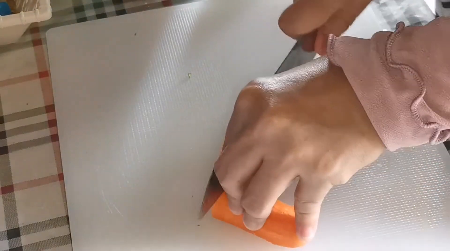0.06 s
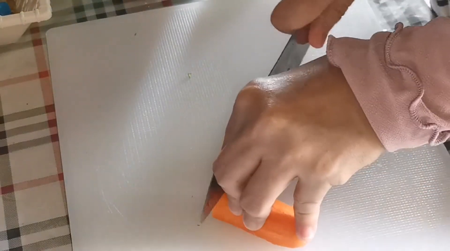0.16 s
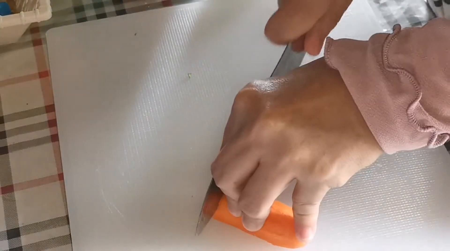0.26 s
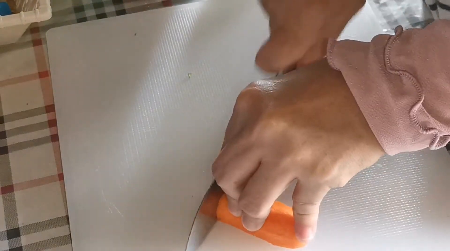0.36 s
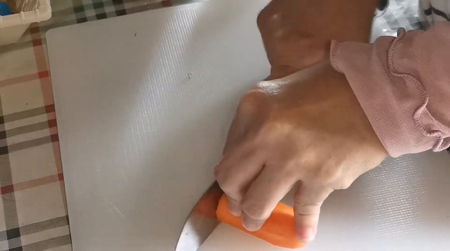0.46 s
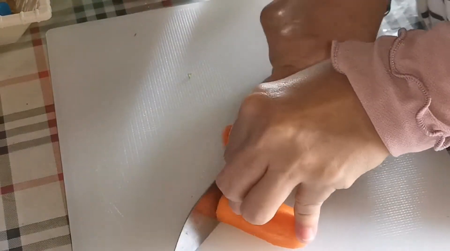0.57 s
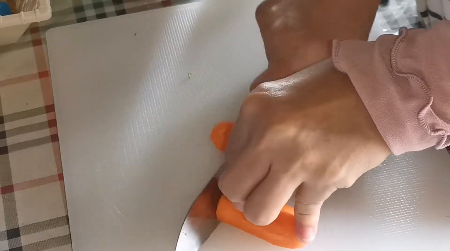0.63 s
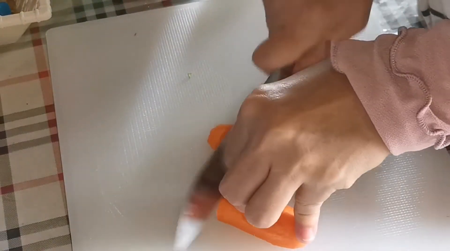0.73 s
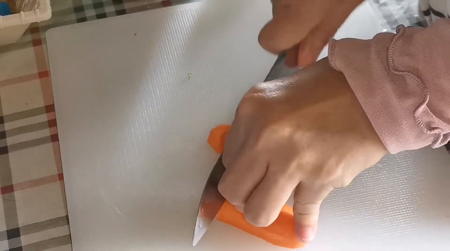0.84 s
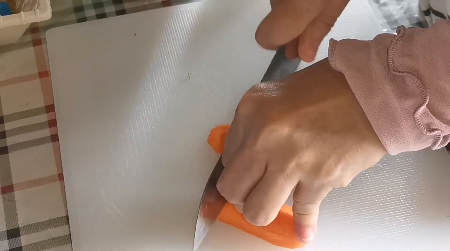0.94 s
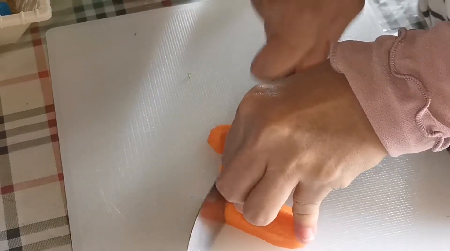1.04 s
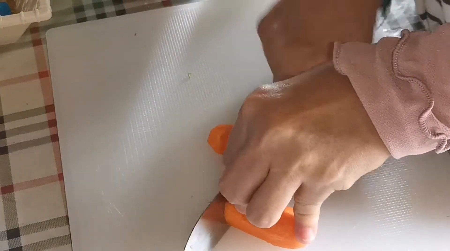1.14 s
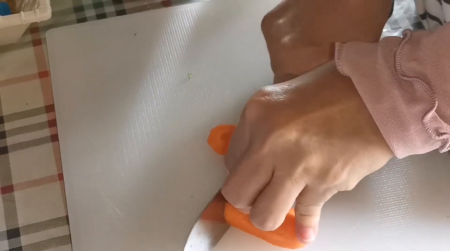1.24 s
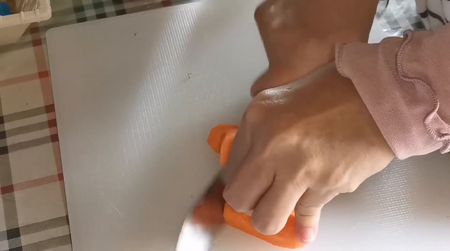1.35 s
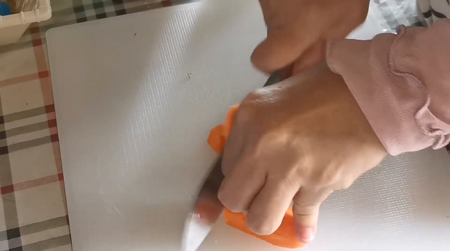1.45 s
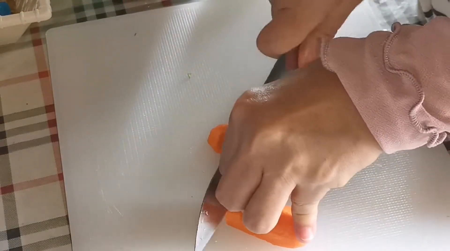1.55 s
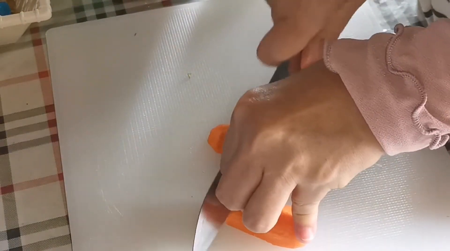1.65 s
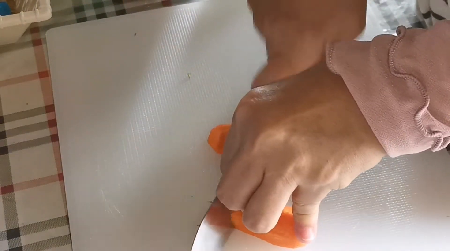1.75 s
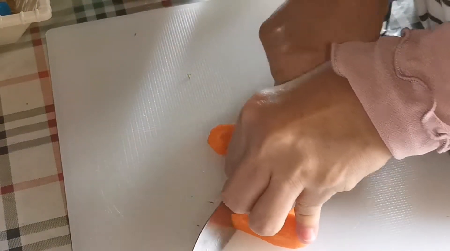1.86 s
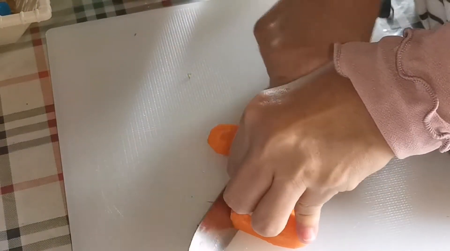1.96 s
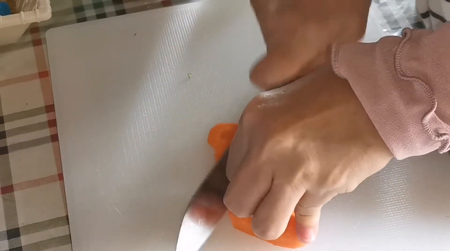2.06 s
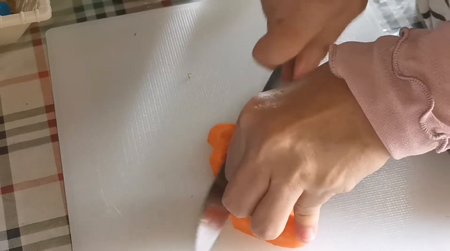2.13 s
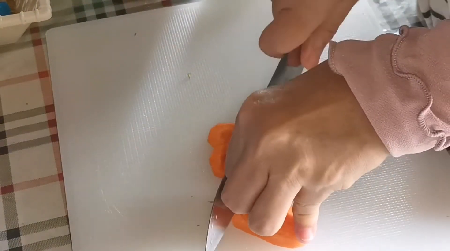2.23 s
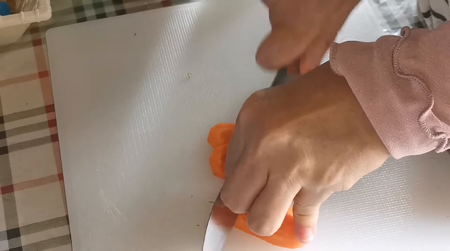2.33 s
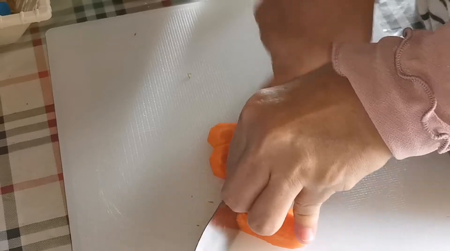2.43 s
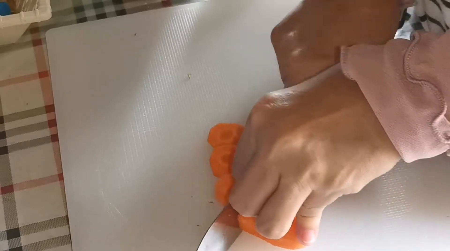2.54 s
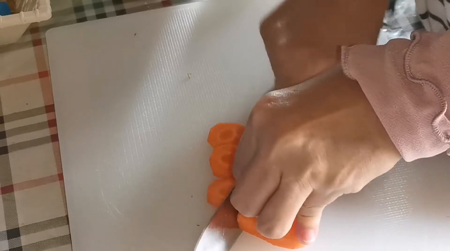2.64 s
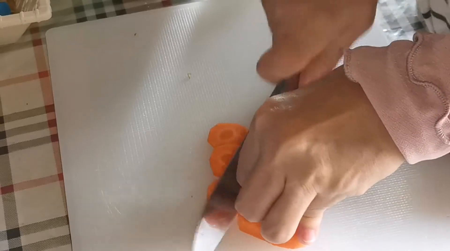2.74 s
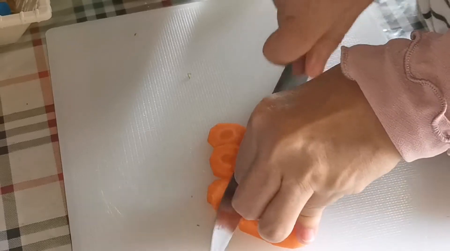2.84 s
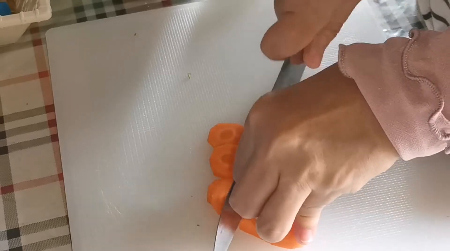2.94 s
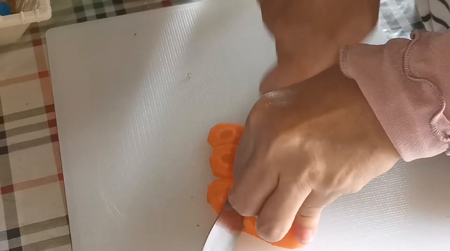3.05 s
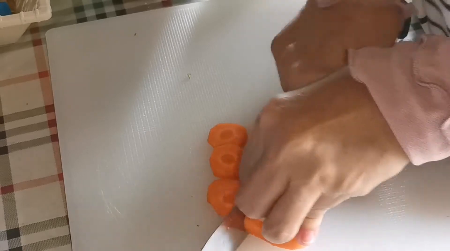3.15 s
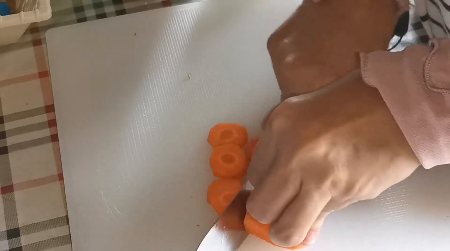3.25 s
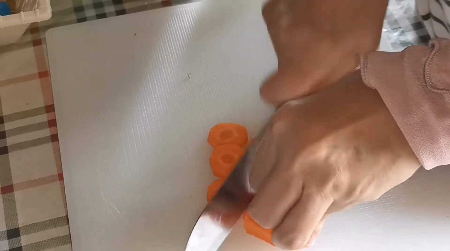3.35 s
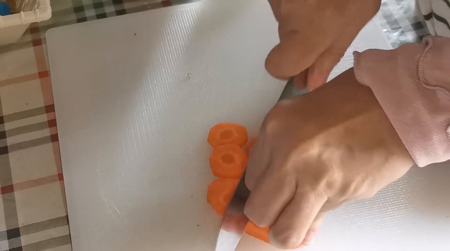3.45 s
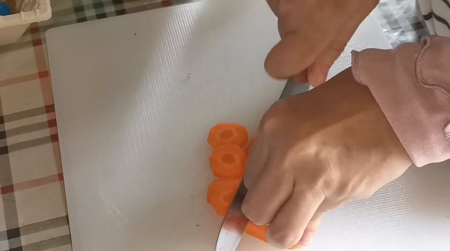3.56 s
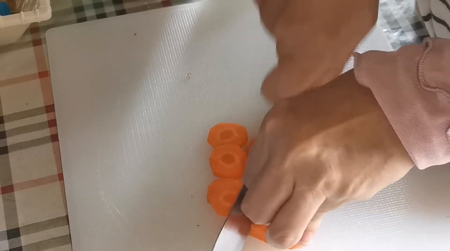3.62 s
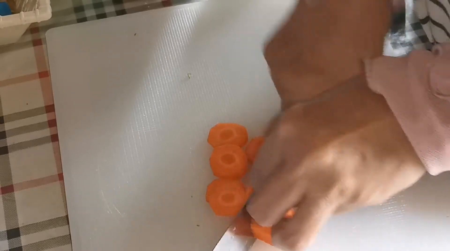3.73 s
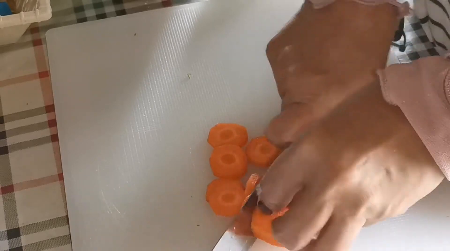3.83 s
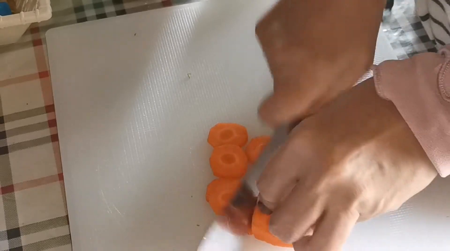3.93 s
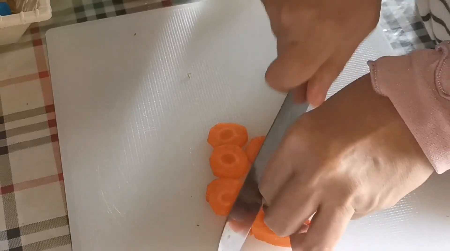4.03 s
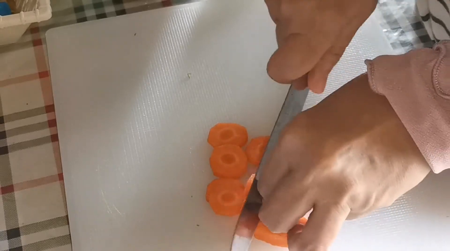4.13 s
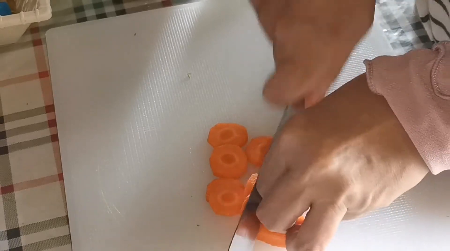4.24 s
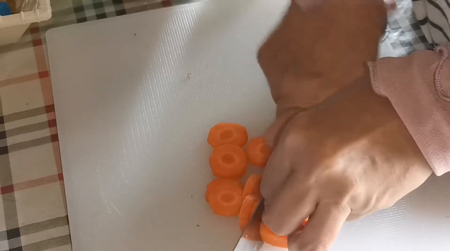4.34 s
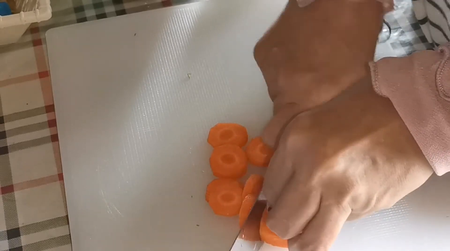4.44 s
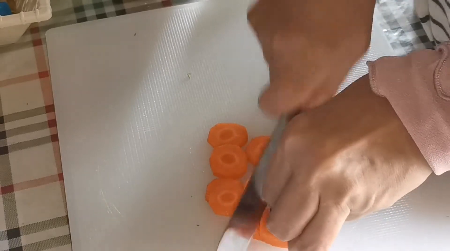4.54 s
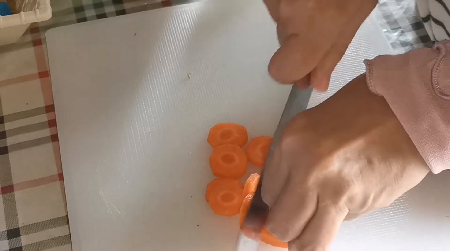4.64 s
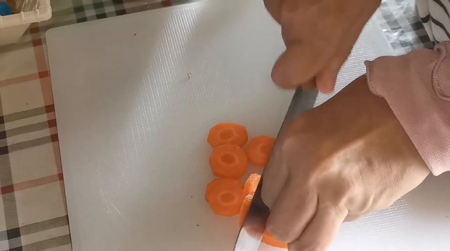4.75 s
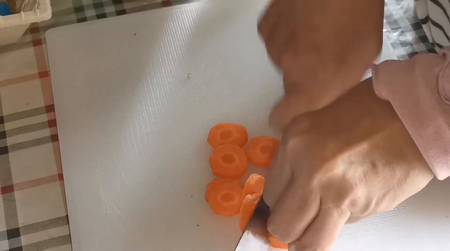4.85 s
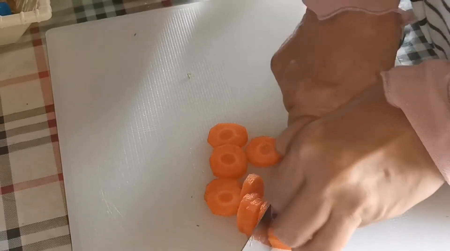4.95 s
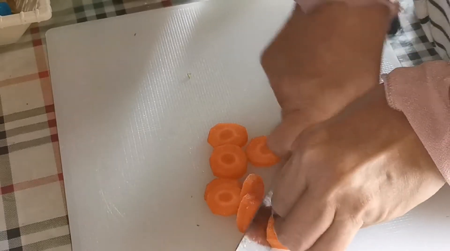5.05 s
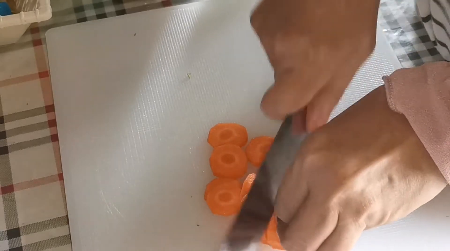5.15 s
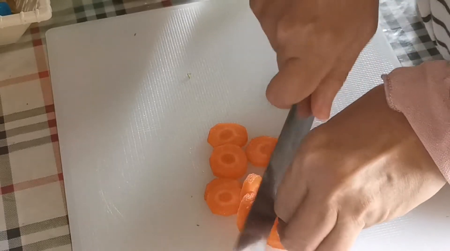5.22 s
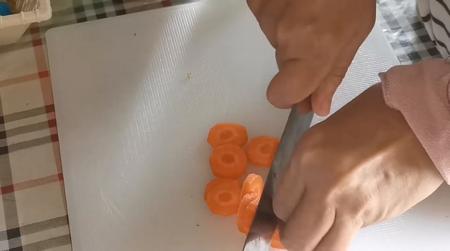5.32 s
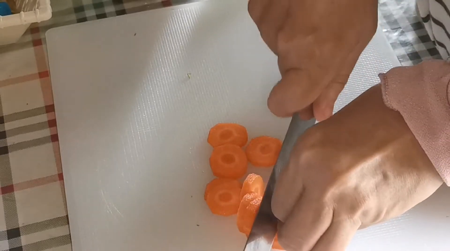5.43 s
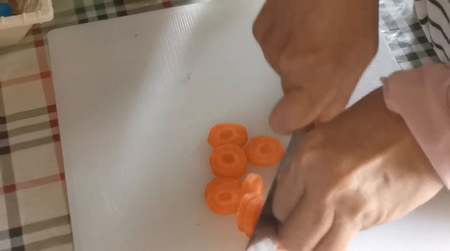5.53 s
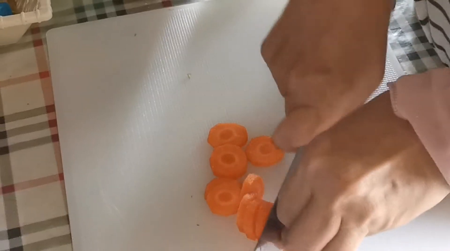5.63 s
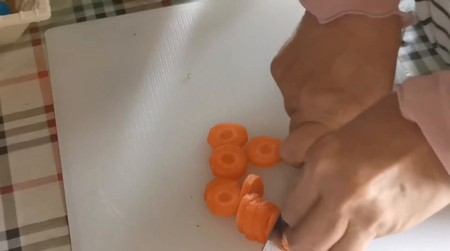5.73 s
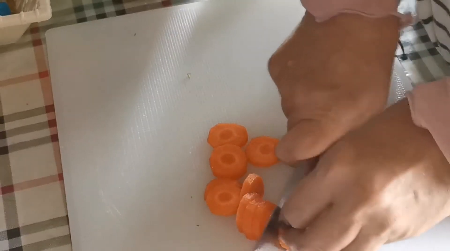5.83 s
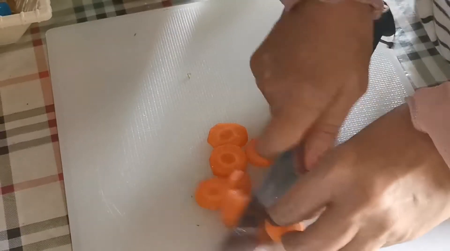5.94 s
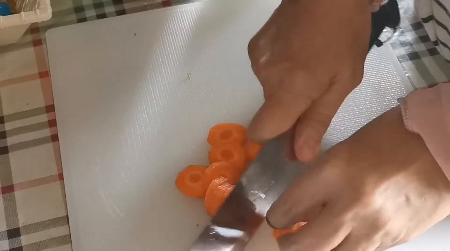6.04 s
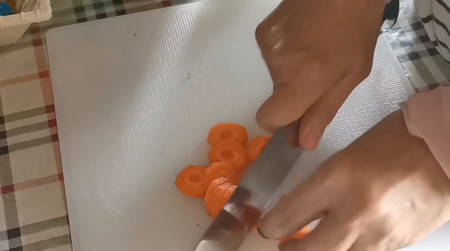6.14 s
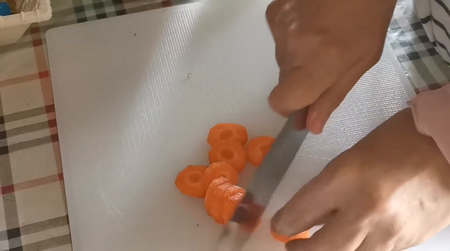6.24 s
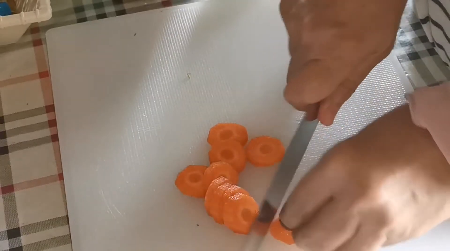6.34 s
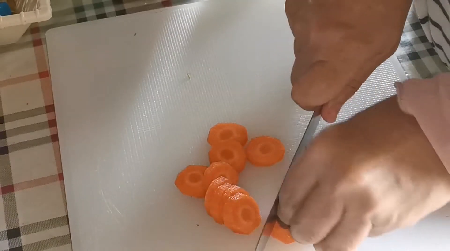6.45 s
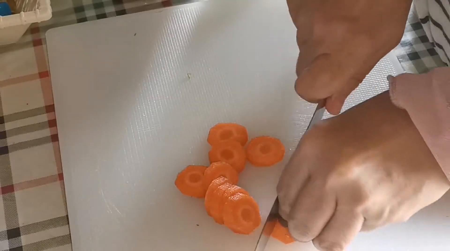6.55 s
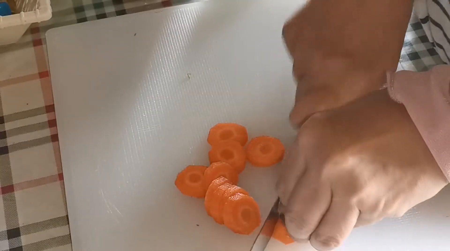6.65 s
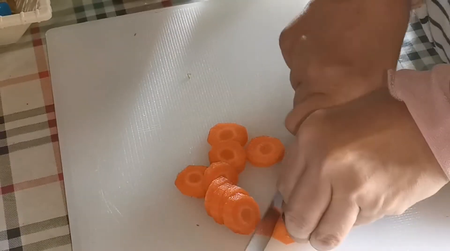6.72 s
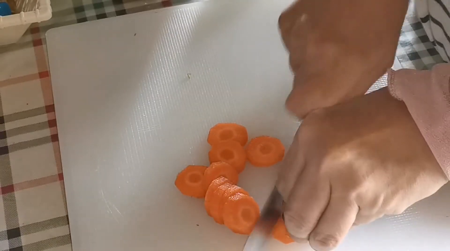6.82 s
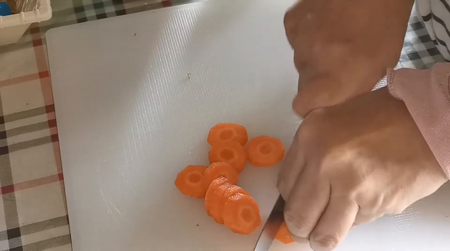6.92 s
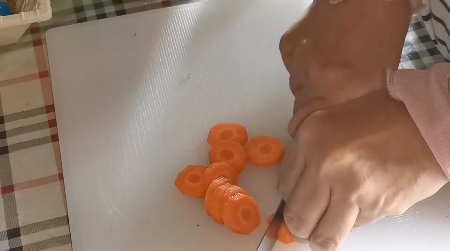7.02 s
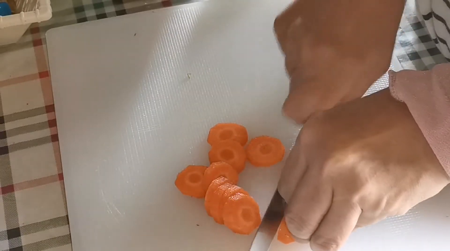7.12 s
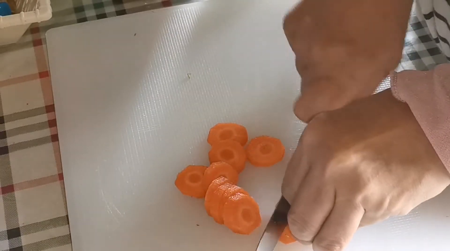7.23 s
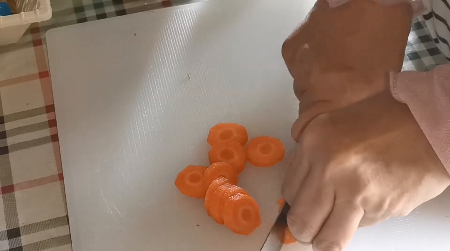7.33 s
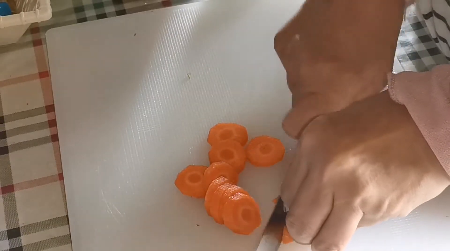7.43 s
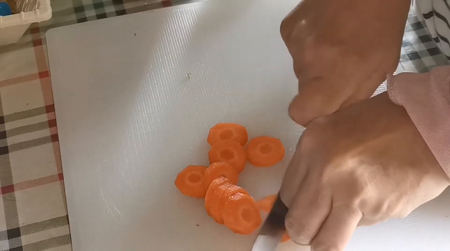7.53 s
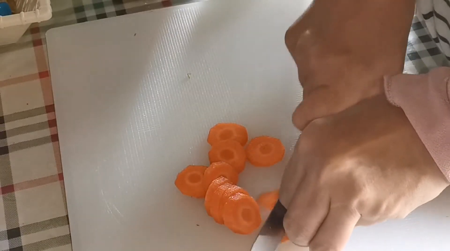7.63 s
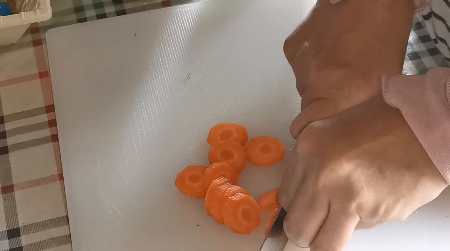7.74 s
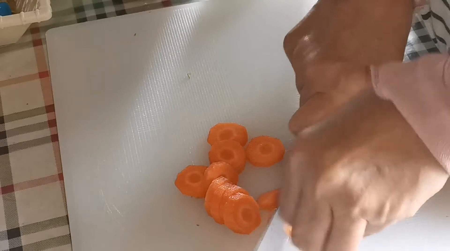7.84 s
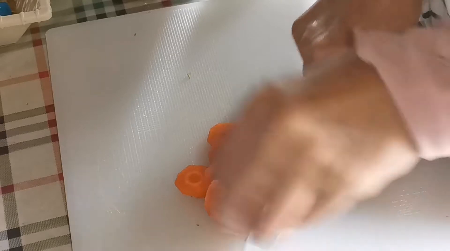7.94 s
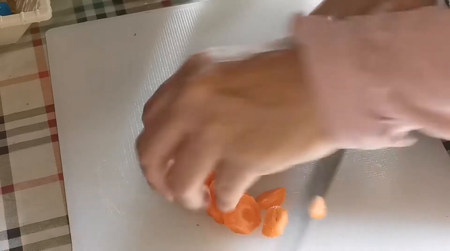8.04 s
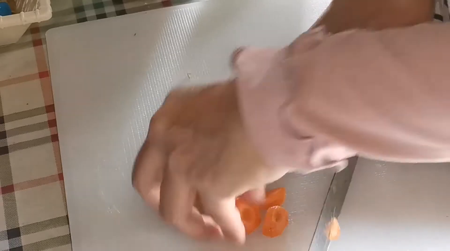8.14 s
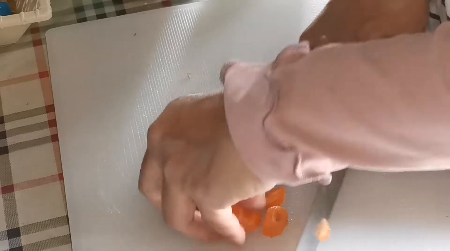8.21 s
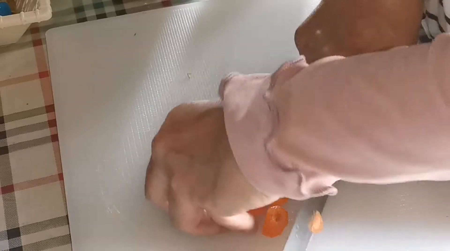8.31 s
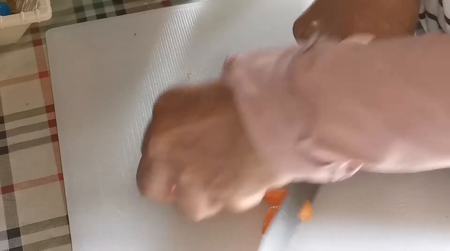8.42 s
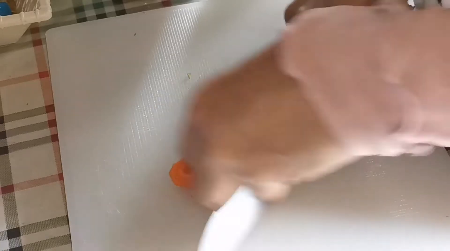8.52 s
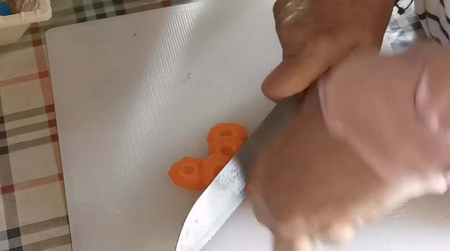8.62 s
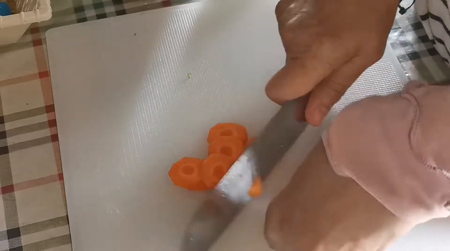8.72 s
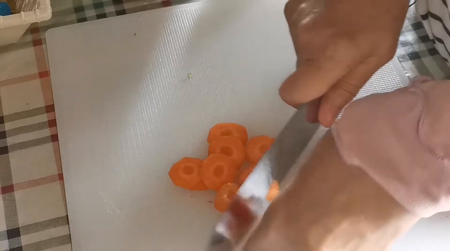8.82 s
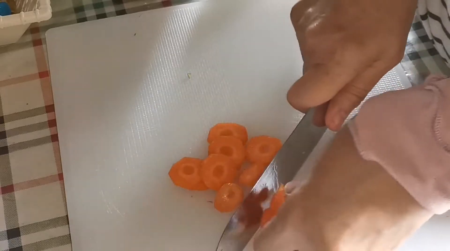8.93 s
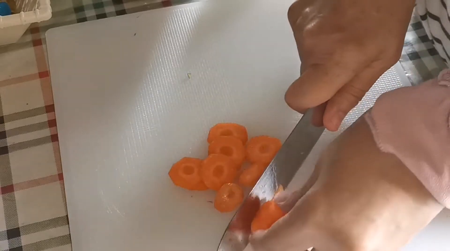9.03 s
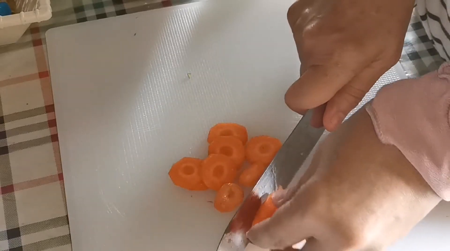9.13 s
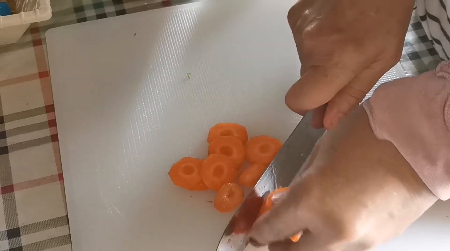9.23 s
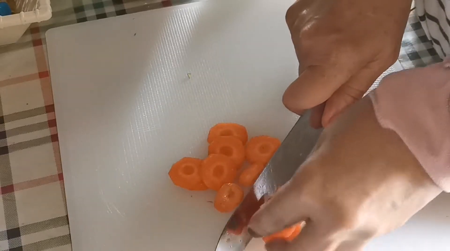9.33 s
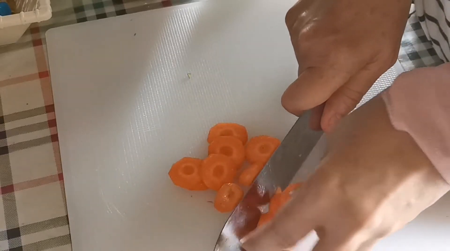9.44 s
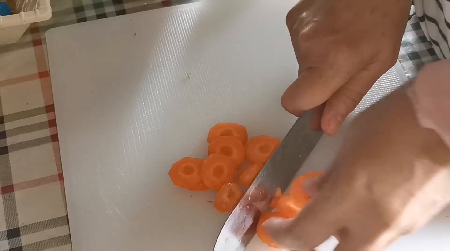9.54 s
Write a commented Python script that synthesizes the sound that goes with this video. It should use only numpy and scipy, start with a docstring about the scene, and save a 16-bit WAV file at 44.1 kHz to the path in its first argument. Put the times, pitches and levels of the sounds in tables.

```python
"""Slicing a carrot

A knife cuts a carrot on a plastic board in a small kitchen. Fibres tear with a hiss, crackle and snap;
the edge knocks on the board, which rocks and thumps on the table, and the room answers briefly.
Late on, a hand drags slices across the board with a scraping swish. Behind: a few distant bird chirps,
a low rumble, a band of hiss near 8 kHz and a fading hum."""
import sys
import numpy as np
from scipy import signal
from scipy.fft import rfft, irfft, next_fast_len
from scipy.io import wavfile

SR = 44100
rng = np.random.default_rng(int(sys.argv[2]) if len(sys.argv) > 2 else 0)


def unload_wav(signal):
    """Save mono or channel-first audio to the path in sys.argv[1] as 16-bit WAV at rate SR, clipped to [-1, 1]."""
    wavfile.write(
        sys.argv[1],
        SR,
        np.round(np.clip(np.atleast_2d(signal).T, -1, 1) * 32767).astype(np.int16),
    )


N = 422301

# board rocking: f/Hz, level/dB, t60/s
ROCKING_MODES = [(158.6, -3, 0.13), (206.4, 8.5, 0.022), (319, 6, 0.047), (436, 5.5, 0.012)]


def amp(db):
    """dB to gain."""
    return 10 ** (np.asarray(db) / 20)


def rms_one(x):
    """Scale to rms 1."""
    return x / np.sqrt(np.mean(x ** 2) + 1e-20)


def in_time(curve):
    """(t/s, value) rows to one value per sample."""
    return np.interp(np.arange(N) / SR, *np.transpose(curve))


def at_hz(curve, hz):
    """Read (f/Hz, value) rows on a log-frequency axis."""
    knots_hz, values = np.transpose(curve)
    return np.interp(np.log(hz), np.log(knots_hz), values)


def band(x, low_hz, high_hz):
    """Band-pass."""
    return signal.sosfilt(signal.butter(2, [low_hz, high_hz], "band", fs=SR, output="sos"), x)


def drift(rate_hz):
    """Slow random wander, rms 1."""
    hop = 40
    r = np.exp(-2 * np.pi * rate_hz * hop / SR)
    slow = signal.lfilter([1], [1, -2 * r, r * r], rng.standard_normal(N // hop + 2002))[2000:]
    return np.interp(np.arange(N) / hop, np.arange(len(slow)), rms_one(slow))


def colour(x, spectrum):
    """Filter by (f/Hz, level/dB) rows; rms 1."""
    size = next_fast_len(N)
    hz = np.maximum(np.fft.rfftfreq(size, 1 / SR), 1)
    return rms_one(irfft(rfft(x, size) * amp(at_hz(spectrum, hz)), size)[:N])


def ring(clicks, hz, t60_s):
    """One mode: each click starts a decaying sine."""
    r, w = amp(-60 / (t60_s * SR)), 2 * np.pi * hz / SR
    return signal.lfilter([0, np.sin(w)], [1, -2 * r * np.cos(w), r * r], clicks + 1e-18)


def grains(per_s, spread_db):
    """Random clicks of uneven size and sign."""
    sizes = amp(spread_db * np.minimum(rng.exponential(1, N), 5)) * rng.choice([-1, 1], N)
    return sizes * (rng.random(N) < per_s / SR)


def cutting():
    """Fibres burst into hiss; clumps of coarser breaks creak in the board; the blade rubs wet flesh."""
    # spectra: f/Hz, level/dB
    tearing_spectrum = [(2940, -1.5), (5000, -1.5), (5880, -8), (6880, -0.5), (8100, -11.5), (9170, -1.5),
                        (11700, -6), (15600, -18)]
    rubbing_spectrum = [(900, -29), (1500, 4), (2300, 7), (3200, -1.5), (4750, 1.5), (6500, -10.5),
                        (9000, -19), (14000, -47)]
    # board under the pressed carrot: f/Hz, level/dB, t60/s
    creak_modes = [(305, -9, 0.04), (631, -5.5, 0.061), (799.5, 4, 0.02), (938, -2.5, 0.033),
                   (1117, -7, 0.015), (1314, -8.5, 0.0074), (1680, -16, 0.0072)]
    # hiss above 12 kHz, weaker at the carrot's thin end: t/s, level/dB
    top_curve = [(0, 0), (5.9, 0), (6.02, -13), (9.58, -13)]
    hiss_gain, creak_gain, rub_gain = stroke_gains()
    tearing = colour(grains(15000, 2.5) * amp(1.5 * drift(40)), tearing_spectrum)
    top = signal.sosfilt(signal.butter(4, 12000, "high", fs=SR, output="sos"), tearing)
    low = signal.sosfilt(signal.butter(4, 12000, fs=SR, output="sos"), tearing)
    hiss = low + amp(in_time(top_curve)) * top
    rub = colour(grains(9000, 0.71) * amp(2.5 * drift(26)), rubbing_spectrum)
    breaks = grains(2500, 1.8) * amp(2.8 * drift(30))
    creak = sum(amp(db) * ring(breaks, hz, t60_s) for hz, db, t60_s in creak_modes)
    return hiss_gain * hiss + creak_gain * rms_one(creak) + rub_gain * rub


def stroke_gains():
    """Hiss, creak and rub gains: each stroke bites, swells as the blade sinks, dies once through."""
    # blade through carrot or along board: start/s, end/s, hiss/dB, creak/dB, rub/dB
    strokes = [(-.1, 0.05, -68.5, -74, -71), (0.382, 0.568, -59, -49.5, -60),
               (1.02, 1.257, -59.5, -48.5, -59), (1.54, 1.588, -73, -63, -67),
               (1.72, 1.954, -59, -46, -59.5), (2.38, 2.611, -58.5, -45.5, -60),
               (2.81, 2.83, -77, -73, -90), (3.062, 3.253, -58, -46, -64), (3.468, 3.487, -72, -75, -78),
               (3.67, 3.849, -58.5, -45.5, -64), (4.32, 4.45, -58.5, -49.5, -61),
               (4.663, 4.68, -82, -79, -86), (4.845, 5.046, -57, -52, -63.5),
               (5.54, 5.815, -64, -48.5, -66), (6.038, 6.09, -67, -49, -57.5),
               (6.682, 6.759, -65, -49.5, -55), (6.942, 6.945, -67, -86, -76),
               (7.027, 7.086, -62.5, -52.5, -51.5), (7.312, 7.346, -63.5, -39, -52),
               (7.364, 7.43, -59.5, -46, -51.5), (7.597, 7.622, -75, -66, -66),
               (7.769, 7.803, -62, -49, -53.5), (8.317, 8.449, -89, -60, -80),
               (8.48, 8.596, -95, -56, -68.5), (8.677, 8.71, -84, -63, -75),
               (8.91, 8.927, -79, -59.5, -76.5), (8.976, 8.985, -86, -49, -86)]
    # fingers and blade shifting between strokes: t/s, level/dB
    handling = [(0, -83), (.35, -73.5), (.7, -80), (1.6, -95), (2.3, -82.5), (3.0, -83), (4.0, -82.5),
                (4.85, -84.5), (5.2, -88), (5.5, -74), (5.95, -85), (6.6, -83), (7.3, -77.5), (7.75, -88),
                (8.2, -86), (9.0, -88), (9.58, -85.5)]
    # rows: hiss, creak, rub
    swell_db_per_s, release_db_per_s = np.vstack([41, 41.5, 24.5]), np.vstack([262, 196, 251.5])
    peak_lead_s, handling_share_db = np.vstack([0.0011, 0.0083, 0.001]), np.vstack([0, 14.5, 4])
    t = np.arange(N) / SR
    rustle_db = in_time(handling) + 2 * drift(5.6)
    power = amp(rustle_db + handling_share_db) ** 2
    for start_s, end_s, *levels_db in strokes:
        span = slice(max(int(start_s * SR), 0), int((end_s + 0.4) * SR))
        to_peak_s = end_s - peak_lead_s - t[span]
        loss_db = np.where(to_peak_s > 0, swell_db_per_s, release_db_per_s) * np.abs(to_peak_s)
        bite_s = max(0.46 * (end_s - start_s), 0.003)
        bite = np.clip((t[span] - start_s) / bite_s, 0, 1)
        power[:, span] += (bite * amp(np.vstack(levels_db) - loss_db)) ** 2
    return np.sqrt(power)


def strike(times_s, levels_db, modes, hardness_db_per_oct=0):
    """Blows ring each mode unevenly; soft ones (hardness < 0) lose treble and a little bass."""
    pivot_hz, bass_share = 1300, 0.085
    onsets = np.round(times_s * SR).astype(int)
    scatter_db = 1.5 * rng.standard_normal((len(onsets), len(modes)))
    out = np.zeros(N)
    for k, (hz, mode_db, t60_s) in enumerate(modes):
        slope = hardness_db_per_oct if hz > pivot_hz else -bass_share * np.minimum(hardness_db_per_oct, 0)
        tilt_db = slope * np.log2(hz / pivot_hz)
        clicks = np.zeros(N)
        clicks[onsets] = amp(levels_db + mode_db + tilt_db + scatter_db[:, k]) * (-1) ** (k + 1)
        out += ring(clicks, hz, t60_s)
    return out


def blows():
    """The edge knocks on the board, the board rocks with a thump, the table booms."""
    # t/s, knock/dB, hardness/(dB/oct), thump/dB, boom/dB
    impacts = [(0.504, -15, -35, -36.5, -46), (0.58, -49, -14, -41.5, -42), (0.604, -47, -24, -59, -57),
               (1.19, -27, -32, -42, -52), (1.275, -40, -19, -38.5, -47), (1.681, -51, -12, -60, -48),
               (1.882, -16, -39, -36, -48), (1.947, -29.5, -11, -26, -49.5), (1.996, -32.5, -27, -53, -49),
               (2.022, -56, -25, -47, -57), (2.498, -20.5, -20, -39, -50), (2.612, -33, 5, -27, -47),
               (3.144, -33, -39, -43, -54), (3.263, -34.5, 6.5, -28, -60), (3.587, -54, -14, -56, -54),
               (3.749, -44, -31, -41.5, -52), (3.86, -23, -36, -22.5, -37), (4.251, -44, -19, -77, -46.5),
               (4.401, -14.5, -23, -37, -50), (4.465, -43, 3, -29.5, -51), (4.787, -49, -17, -63, -50),
               (4.956, -35.5, -28, -47, -57), (5.038, -41, -15, -51, -76), (5.384, -50, -16, -75, -44),
               (5.789, -7.5, 1.5, -36, -42), (6.048, -48, -3, -66, -71), (6.743, -19, -26, -41, -60),
               (6.789, -49, -14, -52, -55), (7.009, -67, -14, -49.5, -46.5), (7.04, -41, 0, -65, -70),
               (7.1, -11.5, -13.5, -40, -46.5), (7.323, -51, -17, -59, -43), (7.437, -4, 1, -40.5, -41.5),
               (7.67, -44, -3, -62, -46.5), (7.799, -4.5, 4, -52, -47), (8.341, -37, -10, -57, -53.5),
               (8.552, -51, -18.5, -63, -62), (8.689, -70, -15.5, -59.5, -61),
               (8.977, -31, -22, -51, -52.5)]
    # f/Hz, level/dB, t60/s
    board_modes = [(336, -25, 0.044), (440, -13, 0.012), (602, -15, 0.043), (850, -9.5, .04),
                   (1065, -8.5, 0.031), (1302, -9.5, 0.018), (1600, -9, 0.017), (1870, -10, 0.015),
                   (2410, -9, 0.0083), (2950, -16, 0.011), (3003, -17.5, 0.017), (3530, -23.5, .011),
                   (3917, -27.5, 0.009), (4900, -35.5, 0.012)]
    table_modes = [(108.5, 10.5, 0.082)]
    times_s, knock_db, hardness, thump_db, boom_db = np.transpose(impacts)
    knock = band(strike(times_s, knock_db, board_modes, hardness), 280, 6500)  # small plate: no bass
    thump = band(strike(times_s, thump_db, ROCKING_MODES), 180, 700)
    boom = band(strike(times_s, boom_db, table_modes), 100, 170)
    return knock + thump + boom


def snaps():
    """Fibres snap and the wet blade ticks: bright noise bursts that also ring the blade."""
    # t/s, level/dB
    bursts = [(0.584, -35.5), (1.0749, -57), (1.256, -29), (1.276, -45), (1.5554, -57), (1.6812, -45.5),
              (1.94, -31), (1.9461, -29), (2.608, -31), (2.6156, -31), (2.833, -62), (3.2505, -28.5),
              (3.261, -42), (3.5885, -47.5), (3.6925, -51), (3.85, -38), (3.858, -43), (4.093, -44.5),
              (4.2488, -46), (4.336, -48), (4.4567, -32.5), (4.4644, -40), (4.676, -49), (4.787, -43.5),
              (5.029, -29), (5.0384, -25), (5.2644, -46.5), (5.383, -48), (5.472, -49), (5.811, -39.5),
              (6.0472, -61), (6.788, -36), (6.9485, -45.5), (7.011, -41), (7.043, -45.5), (7.1086, -40),
              (7.2558, -47), (7.331, -36.5), (7.381, -47.5), (7.6191, -51.5), (7.6705, -51),
              (8.5608, -56.5), (8.6852, -56)]
    crest_db, t60_s = 11, 0.016
    times_s, levels_db = np.transpose(bursts)
    clicks = np.zeros(N)
    clicks[np.round(times_s * SR).astype(int)] = amp(levels_db - crest_db)
    envelope = signal.lfilter([1], [1, -amp(-60 / (t60_s * SR))], clicks + 1e-18)
    blade = amp(-6) * ring(clicks, 4720, t60_s)
    return envelope * rms_one(band(rng.standard_normal(N), 1500, 6500)) + blade


def dragged_slices():
    """A hand drags slices along; dense soft contacts keep the rocking board murmuring."""
    # t/s, level/dB
    drag = [(8.33, -78), (8.35, -59.5), (8.45, -54), (8.62, -63), (8.68, -74), (8.7, -58), (8.8, -80)]
    t = np.arange(N) / SR
    contacts = grains(1500, 1.8) * amp(2.1 * drift(17))
    murmur = sum(amp(db) * ring(contacts, hz, t60_s) for hz, db, t60_s in ROCKING_MODES)
    moving = (t > drag[0][0]) & (t < drag[-1][0])
    return rms_one(murmur) * amp(in_time(drag)) * moving


def kitchen(x):
    """Room reverb: dense noise that builds after the first wall and dies band by band."""
    # f/Hz, t60/s
    decay = [(150, 0.19), (500, 0.37), (1400, 0.32), (3700, 0.37), (8000, 0.13)]
    first_wall_s, build_s = 0.006, 0.014
    t = np.arange(SR // 2) / SR
    edges_hz = 80 * 2 ** np.arange(0, 7.6, 0.5)
    tail = sum(band(rng.standard_normal(len(t)), low, high) * amp(-60 * t / at_hz(decay, low))
               for low, high in zip(edges_hz, edges_hz[1:]))
    tail *= np.clip((t - first_wall_s) / build_s, 0, 1)
    return signal.fftconvolve(x, tail / np.sqrt(np.sum(tail ** 2)))[:N]


def chirps_and_swishes():
    """Distant bird chirps, and a broad scraping swish as the slices are pushed: noise-blurred glides."""
    # the two widest rows sound as swishes; the one at 8.5 s is the scrape
    # start/s, length/s, first f/Hz, last f/Hz, level/dB, bandwidth/Hz
    glides = [(2.208, 0.17, 4920, 4950, -64.5, 500), (5.05, 0.175, 5200, 5400, -58.5, 1500),
              (5.13, 0.15, 6050, 6350, -63, 300), (5.115, 0.21, 3030, 2980, -69, 80),
              (5.23, .2, 5040, 5450, -61.5, 400), (6.276, 0.36, 2820, 2940, -70.5, 132),
              (7.55, 0.13, 6280, 6400, -66, 200), (7.645, 0.14, 4950, 5180, -60, 600),
              (8.5, 0.16, 3780, 4300, -70, 900)]
    glide_share, ramp_share, fade_db = 0.75, 0.19, 16.5
    t = np.arange(SR // 2) / SR
    out = np.zeros(N)
    for start_s, length_s, first_hz, last_hz, level_db, width_hz in glides:
        progress = t / length_s
        r = np.exp(-np.pi * width_hz / SR)
        noise = rng.standard_normal(len(t)) + 1j * rng.standard_normal(len(t))
        blur = signal.lfilter([1], [1, -2 * r, r * r], noise)
        pitch_hz = np.interp(progress, [0, glide_share], [first_hz, last_hz])
        tone = rms_one(np.real(blur * np.exp(2j * np.pi * np.cumsum(pitch_hz) / SR)))
        gate = np.interp(progress, [0, ramp_share, 1, 1 + ramp_share], [0, 1, 1, 0])
        onset = int(start_s * SR)
        out[onset:onset + len(t)] += amp(level_db - fade_db * progress) * gate * tone
    return out


def background():
    """Air noise, a lumpy rumble near 100 Hz, a fading two-tone hum and faint high hiss."""
    # f/Hz, level/dB
    air_spectrum = [(12, -34), (20, -15), (81, -5), (101, -10), (119, -11.5), (197, -11), (253, -7.5),
                    (343, -11), (454, -9.5), (1780, -23), (2860, -30), (3110, -31), (6070, -42.5),
                    (8020, -29.5), (15600, -104)]
    hum_tones = [(247.6, -5.5), (298, -7.5)]
    # t/s, level/dB
    air_curve = [(0.0, -61.5), (1.6, -58.5), (2.1, -59.5), (2.64, -60.5), (5.41, -60.5), (7.41, -59),
                 (8.06, -63.5), (8.53, -62), (9.58, -62)]
    rumble_curve = [(0.0, -57.5), (0.3, -66), (0.88, -67), (1.52, -62.5), (2.05, -67), (2.29, -67.5),
                    (3.36, -60.5), (3.8, -75), (4.15, -56), (4.9, -62.5), (5.3, -57), (5.76, -68),
                    (6.27, -58), (7.2, -69), (7.6, -68), (8.53, -66.5), (9.1, -68), (9.58, -61)]
    hum_curve = [(0, -52.5), (.6, -57), (1.15, -57.5), (1.4, -106), (9.58, -99)]
    t = np.arange(N) / SR
    air = colour(rng.standard_normal(N), air_spectrum) * amp(in_time(air_curve) + drift(8.3))
    rumble = rms_one(band(rng.standard_normal(N), 74.5, 126.4))
    rumble *= amp(in_time(rumble_curve) + 1.9 * drift(3.6))
    hum = sum(amp(db + 0.27 * drift(1.4)) * np.sin(2 * np.pi * hz * t) for hz, db in hum_tones)
    hiss = amp(-91) * rms_one(band(rng.standard_normal(N), 8500, 12500))
    return air + rumble + hum * amp(in_time(hum_curve)) + hiss


def scene():
    """Mono mix; only blows, snaps, chirps and swishes feed the reverb."""
    hits, glides = blows() + snaps(), chirps_and_swishes()
    room = kitchen(amp(-13.5) * hits + amp(-5.5) * glides)
    return (hits + cutting() + dragged_slices() + glides + room + background())[None]


def record(dry):
    """Steep low-pass at 15.8 kHz."""
    return signal.sosfilt(signal.ellip(12, 0.5, 60, 15800, fs=SR, output="sos"), dry)


dry = scene()
out = record(dry)
unload_wav(out)
```